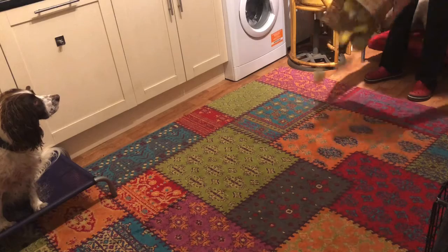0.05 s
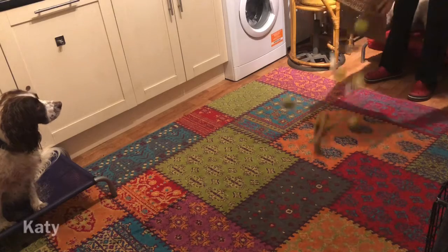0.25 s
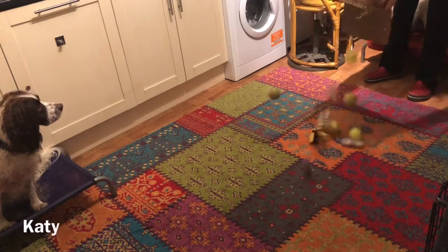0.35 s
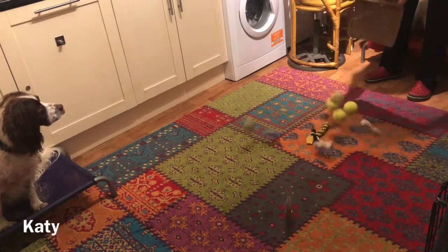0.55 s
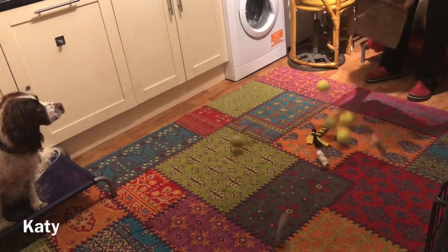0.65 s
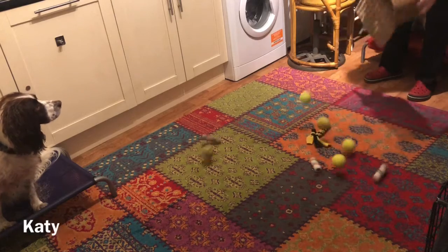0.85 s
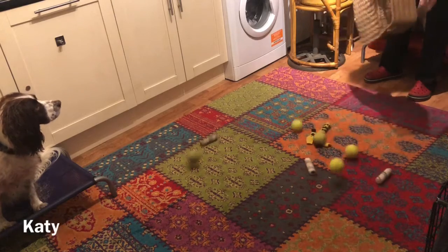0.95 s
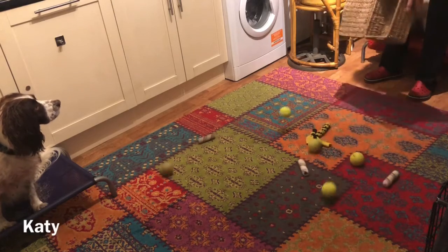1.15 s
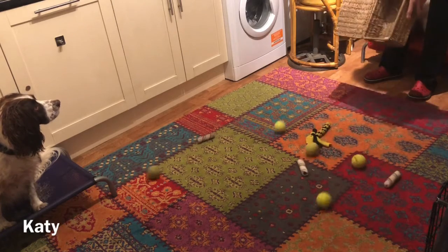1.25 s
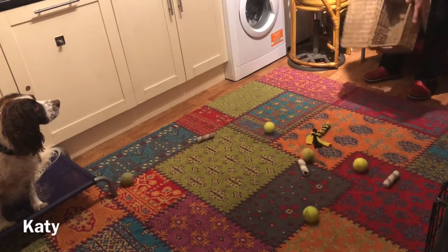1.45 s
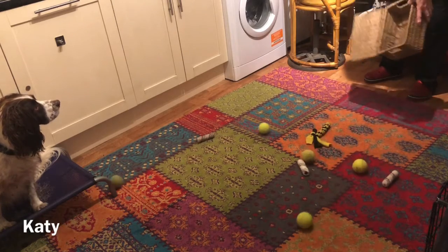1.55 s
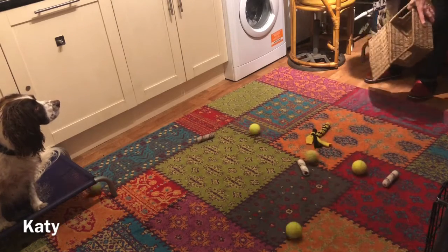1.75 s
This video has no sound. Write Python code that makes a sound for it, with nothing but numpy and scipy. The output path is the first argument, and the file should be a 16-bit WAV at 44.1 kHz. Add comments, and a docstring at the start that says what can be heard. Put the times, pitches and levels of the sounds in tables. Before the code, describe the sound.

Tennis balls thud and bounce onto a kitchen floor while small hard toys clack together.

```python
"""In a kitchen with a hard floor, a wicker basket is tipped out over a rug.
Tennis balls land and bounce with hollow thuds that set the floor booming.
Small hard toys clack against each other, and the room rings briefly after each blow.
Behind them the wicker rustles and creaks, and an appliance hums."""
import sys
import numpy as np
from scipy import signal
from scipy.fft import rfft, irfft
from scipy.io import wavfile

SR = 44100
rng = np.random.default_rng(int(sys.argv[2]) if len(sys.argv) > 2 else 0)


def dump_mix(stems):
    """Bounce the given channels to the path in sys.argv[1] as a 16-bit WAV at rate SR."""
    frames = np.atleast_2d(stems).T  # one column per channel
    limited = np.clip(frames, -1, 1)  # hard clip at full scale
    pcm = np.round(limited * 32767).astype(np.int16)
    wavfile.write(sys.argv[1], SR, pcm)


N = 79380
SIZE = int(.6 * SR)  # samples in one blow and its echo
HZ = np.maximum(np.arange(SIZE + 1) * SR / (2 * SIZE), 1)  # the frequencies in one blow's spectrum


def from_db(db):
    """Turn decibels into a number to multiply a sound by."""
    return 10 ** (np.asarray(db) / 20)


def at_hz(points, hz):
    """Read between (frequency, value) points, giving each octave equal space."""
    frequencies, values = np.transpose(points)
    return np.interp(np.log(hz), np.log(frequencies), values)


def causal(db):
    """A filter with these levels that never sounds before the blow (minimum phase)."""
    cepstrum = irfft(db * np.log(10) / 20)
    cepstrum[1:SIZE] *= 2
    cepstrum[SIZE + 1:] = 0
    return np.exp(rfft(cepstrum))


def noise(spectrum):
    """Noise with the given balance of low and high, at an average (rms) level of 1."""
    hz = np.maximum(np.arange(N // 2 + 1) * SR / N, 1)
    x = irfft(rfft(rng.standard_normal(N)) * from_db(at_hz(spectrum, hz)), N)
    return x / x.std()


def add(out, s, x):
    """Mix x into out, starting at s seconds."""
    i = int(s * SR)
    out[i:i + len(x)] += x[:N - i]


def uneven(spread_db=1.5, per_octave=12):
    """Random peaks and dips above 400 Hz, in dB, so no two blows sound alike."""
    bumps = rng.standard_normal(400)
    return spread_db * np.interp(np.log2(HZ) * per_octave, np.arange(400), bumps) * (HZ > 400)


def background():
    """An appliance's slightly wavering mains hum over the still air of the room."""
    # the hum's tones: (frequency [Hz], level [dB])
    tones = [(99.6, -57.5), (199.2, -84)]
    # the air's soft noise: (frequency [Hz], relative level [dB])
    air = [(25, -25), (45, -28), (70, 10), (110, -6.5), (160, -7), (280, -4), (400, -7), (600, -13),
           (1000, -26.5), (1600, -24.5), (3000, -46), (6000, -46), (16000, -35)]
    t = np.arange(N) / SR
    waver = from_db(.5 * np.interp(t, np.linspace(0, N / SR, 30), rng.standard_normal(30)))
    hum = sum(np.sqrt(2) * from_db(db) * np.sin(2 * np.pi * (hz * t + rng.random())) for hz, db in tones)
    return hum * waver + from_db(-64) * noise(air)


def room_tails(count, lag_cycles, build_s):
    """The kitchen's ringing, one spectrum per blow: noise that swells, then fades, deep bass last."""
    # how long the room rings: (frequency [Hz], time to fade by 60 dB [s])
    fade_times = [(45, 1.7), (100, 0.17), (220, 0.42), (530, 0.29), (1400, 0.36), (3700, 0.23), (8000, 0.2),
                  (15000, 0.14)]
    edges = 25 * 2 ** np.arange(0, 9.5, 1 / 3)  # three bands to an octave
    t, tails = np.arange(SIZE) / SR, np.zeros((count, SIZE))
    white = rfft(rng.standard_normal(4 * SIZE))
    white_hz = np.arange(len(white)) * SR / (4 * SIZE)
    starts = (rng.random(count) * 3 * SIZE).astype(int)
    for low, high in zip(edges, edges[1:]):
        hz = np.sqrt(low * high)
        band = irfft(white * ((white_hz >= low) & (white_hz < high)))
        age = np.maximum(t - lag_cycles / hz, 0)  # any lag holds the low notes back most
        shape = (1 - np.exp(-age / build_s)) * from_db(-60 * age / at_hz(fade_times, hz))
        for tail, i in zip(tails, starts):
            x = band[i:i + SIZE] * shape
            tail += x * np.sqrt(2 * (high - low) / SR / (x @ x))  # same energy for every Hz
    return rfft(tails, 2 * SIZE)


def first_arrivals():
    """The spectrum of the direct sound and its first echoes, a little different for each blow."""
    # echoes off the nearest surfaces: (delay [s], level against the direct sound [dB])
    echoes = [(.0037, -10), (.0058, -15), (.0106, -10)]
    x = np.zeros(2 * SIZE)
    x[0] = 1
    for s, db in echoes:
        x[int(s * SR * rng.uniform(.93, 1.07))] += from_db(db)
    return rfft(x)


def basket(creak_hz=2490, creak_width_hz=410, slips_per_s=480):
    """The wicker rustles faintly as it is tipped, and creaks in small slips as it is lifted."""
    # how loud the rustle is: (time [s], level [dB])
    rustle_levels = [(0, -66.5), (.035, -72.5), (.055, -65), (.15, -68.5), (.25, -74.5), (1.2, -70.5),
                     (1.45, -75.5), (1.53, -74.5), (1.56, -72.5), (1.68, -74.5), (1.78, -71)]
    # the rustle's tone: (frequency [Hz], relative level [dB])
    rustle_tone = [(100, -15), (400, 1.5), (1200, -1), (1900, -2), (2600, -3), (4000, -6), (7500, -8),
                   (10000, -13), (16000, -15)]
    # how loud the creak is: (time [s], level [dB])
    creak_levels = [(1.6, -91), (1.701, -85), (1.775, -76.5), (1.8, -70)]
    t = np.arange(N) / SR
    rustle_gain = from_db(np.interp(t, *np.transpose(rustle_levels)))
    creak_gain = from_db(np.interp(t, *np.transpose(creak_levels)))
    slips = (rng.random(N) < slips_per_s / SR) * rng.standard_normal(N)
    creak = signal.lfilter(*signal.iirpeak(creak_hz, creak_hz / creak_width_hz, fs=SR), slips + 1e-18)
    return rustle_gain * noise(rustle_tone) + creak_gain * creak / creak.std()


def crack(fade_s=.0005):
    """A burst of tiny contacts: a filter that spreads a click in time and leaves its tone alone."""
    burst = rfft(rng.standard_normal(256) * np.exp(-np.arange(256) / SR / fade_s), 2 * SIZE)
    return burst / (np.abs(burst) + 1e-9)


def toys(gain_db=8, ring_octaves=.42):
    """Hard toys collide: a short crack with one broad ring that dies fast and a few lasting notes."""
    # each clack, with relative levels: (time [s], level [dB], ring pitch [Hz], ring [dB],
    # body [dB], edge [dB], direct sound [dB], lasting notes [dB])
    clacks = [(0.1234, -43, 14800, 8, -3, 5.5, 1.5, -19.5), (0.1933, -41, 5460, 9.5, 15.5, -6, -13, -26),
              (.2418, -21.5, 10000, 3.5, 4, -3.5, -5.5, -38), (0.3953, -33, 6140, 9.5, 3, -4, -3.5, -22),
              (0.412, -31, 4230, 5, 6, -5, -1, -32), (0.4506, -20, 7200, 12, -3, 0, 1.5, -8),
              (0.5847, -33, 3970, 9, 7, -3, -6, -34), (.5893, -23, 7800, 4.5, 0.5, -2, 1, -23),
              (.6820, -36, 7600, 5.5, 3, -3, -4, -25), (0.689, -33, 2920, 7.5, -1, -6, -2, -12),
              (0.7533, -28, 7800, 2, 3, 6, -3, -24), (0.7584, -33, 8000, 5, -8, -4, 0.5, -19),
              (0.7927, -31, 5800, 5.5, 6.5, 1, 4, -6.5), (0.853, -25.5, 4450, -1, 8.5, -4.5, -6.5, -18),
              (0.868, -33, 8300, 9.5, -12, -3.5, 2.5, -22), (.8790, -33.5, 6150, 5, -2, -2, 0, -19),
              (0.9371, -39, 4800, 11, 7.5, -3, -0.5, -22), (.9480, -38.5, 7000, 7.5, -15, -16, -2, -26),
              (.9680, -34.5, 3800, -1, 6.5, -5, -2.5, -29), (0.984, -46, 5500, -10, 13, -14, -16, -9),
              (1.0104, -29.5, 7500, 12, 7.5, -7.5, -4.5, -22), (1.017, -47, 7500, 8, -9, -18, -7, -19),
              (1.0750, -46.5, 5000, 3, 7, -22, 3.5, -26), (1.089, -32.5, 5550, 1, 0, -9.5, 2.5, -12),
              (1.1100, -42, 3000, -1, 10.5, -5, -6, -17), (1.123, -34, 5900, 1, 8.5, -13, -8, -28),
              (1.1400, -51, 6000, -8, 9, -12, -9, -18), (1.2710, -52.5, 3150, 2.5, 14, 1, -1, -15)]
    # where a clack's parts lie: (body [Hz], middle [Hz], edge [Hz])
    part_hz = [2460, 6160, 12700]
    # the tone all clacks share: (frequency [Hz], relative level [dB])
    toy_tone = [(200, -28), (1000, -15), (1750, -8), (2200, -1), (3000, 1), (3700, 1), (5300, 1), (8000, 1),
                (10500, -4.5), (13000, -7.5), (16000, -11.5)]
    # a toy's lasting notes: (frequency [Hz], relative level [dB], time to fade by 60 dB [s])
    toy_notes = [(2143, -27.5, 0.19), (2270, -34, 0.15), (2393, -30, 0.17), (2786, -30.5, 0.14),
                 (3135, -27.5, 0.072), (4880, -43, 0.087), (5540, -27, 0.051)]
    out, t = np.zeros(N), np.arange(SIZE) / SR
    waves = [from_db(db - 60 * t / fade_s) * np.sin(2 * np.pi * hz * t) for hz, db, fade_s in toy_notes]
    notes = rfft(waves, 2 * SIZE)
    tails = room_tails(len(clacks), lag_cycles=0, build_s=.0036)
    for (s, db, ring_hz, ring_db, body_db, edge_db, direct_db, notes_db), tail in zip(clacks, tails):
        ring = ring_db / (1 + (np.log2(HZ / ring_hz) / ring_octaves) ** 2)
        balance = at_hz(list(zip(part_hz, (body_db, 0, edge_db))), HZ)
        tone_db = db + at_hz(toy_tone, HZ) + ring + balance + uneven()
        strengths = from_db(notes_db + 3 * rng.uniform(-1, 1, len(notes)))
        response = tail + from_db(direct_db) * crack() * first_arrivals() + strengths @ notes
        add(out, s, irfft(causal(tone_db) * response)[:SIZE])
    return from_db(gain_db) * out


def balls(gain_db=12, lag_cycles=1.9, felt_slope=4.7, scuff_db=-19.5):
    """Tennis balls land softly: the hollow shell's pock comes first, the floor's thump and boom after."""
    # each landing, with relative levels: (time [s], boom [dB], thump [dB], pock [dB],
    # where the treble falls away [Hz], direct sound [dB])
    bounces = [(0.203, 0, -6.5, -8.5, 2370, -3), (0.304, 0, -5.5, -8.5, 1960, -6.5),
               (0.4089, 1.5, -7.5, -8, 2860, -4.5), (0.5487, 0, -7, -16, 1240, -3.5),
               (.6710, -10, -9, -19.5, 1300, -5.5), (.7440, -5.5, -11, -19.5, 1220, -5),
               (0.852, -17, -15, -14.5, 3000, -2.5), (.9430, -15.5, -22, -21, 1360, -3),
               (1.0105, -11.5, -11, -24, 1510, -3.5), (1.1040, -21, -28, -20.5, 1390, -4.5),
               (1.2480, -44, -31, -27, 1400, -14), (1.3120, -14.5, -19.5, -26.5, 1670, -2.5),
               (1.4850, -34, -35, -39, 930, -7)]
    # where a landing's parts lie: (boom [Hz], thump [Hz], pock [Hz])
    part_hz = [83, 250, 895]
    # the tone all landings share: (frequency [Hz], relative level [dB])
    ball_tone = [(30, -11.5), (45, 3), (65, -5), (110, 5), (170, 1.5), (300, 3), (480, -3), (700, -1.5),
                 (900, -4), (1060, -2), (1250, -4.5), (2100, -8), (3000, -12.5), (16000, -21.5)]
    out = np.zeros(N)
    lag = np.exp(-2j * np.pi * lag_cycles * np.log(HZ))  # lower notes arrive later
    tails = room_tails(len(bounces), lag_cycles, build_s=.0023)
    for (s, *part_db, top_hz, direct_db), tail in zip(bounces, tails):
        soft_contact = 1 / (1 + (HZ / top_hz) ** (2 * felt_slope))  # a soft blow has little treble
        scuff = from_db(scuff_db) ** 2 / (1 + (HZ / top_hz / 2) ** 2)  # the felt's faint brushing
        felt_db = 10 * np.log10(soft_contact + scuff)
        balance = at_hz(list(zip(part_hz, part_db)), HZ)
        tone_db = at_hz(ball_tone, HZ) + balance + felt_db + uneven()
        response = tail + from_db(direct_db) * lag * first_arrivals()
        add(out, s, irfft(causal(tone_db) * response)[:SIZE])
    return from_db(gain_db) * out


def scene():
    """All the sounds together in one channel."""
    return (background() + basket() + balls() + toys())[None]


def record(dry, low_cut_hz=38, high_cut_hz=16000):
    """Filters remove the deepest bass and the very highest treble."""
    x = signal.sosfilt(signal.butter(4, low_cut_hz, "high", fs=SR, output="sos"), dry)
    return signal.sosfilt(signal.ellip(10, .2, 70, high_cut_hz, fs=SR, output="sos"), x)


dry = scene()
out = record(dry)
dump_mix(out)
```